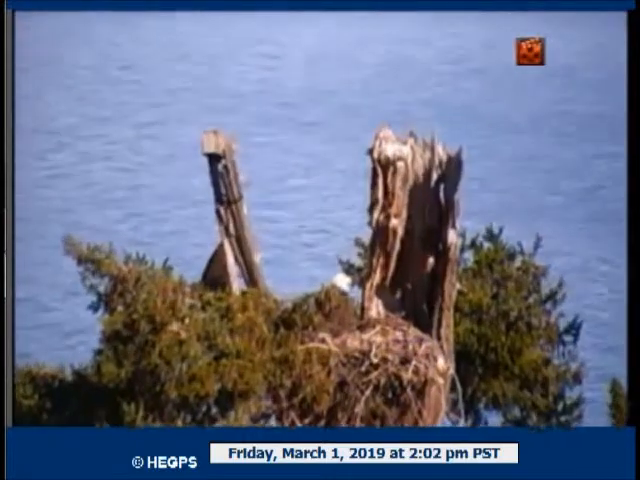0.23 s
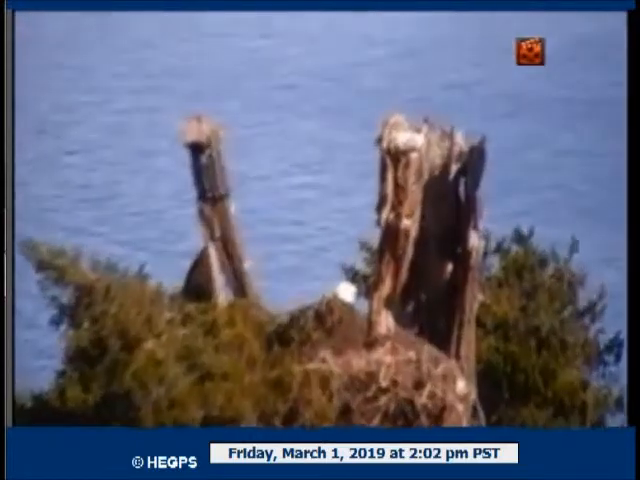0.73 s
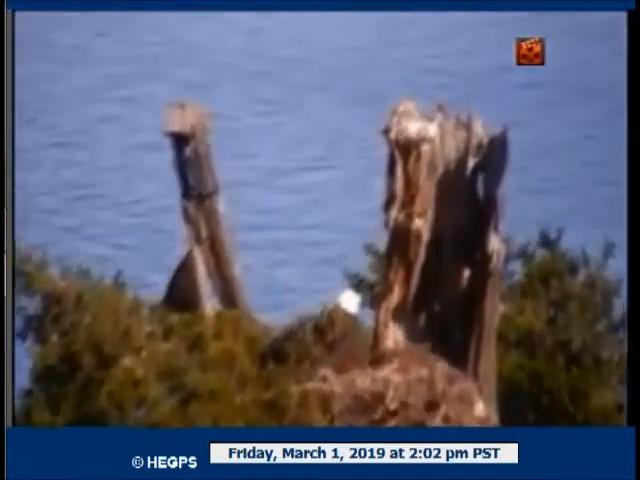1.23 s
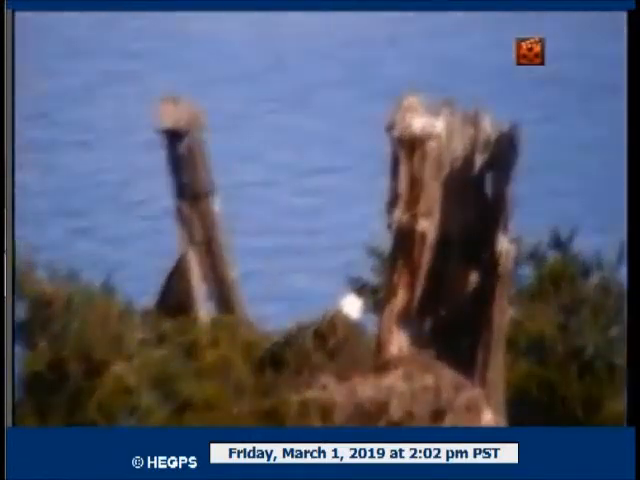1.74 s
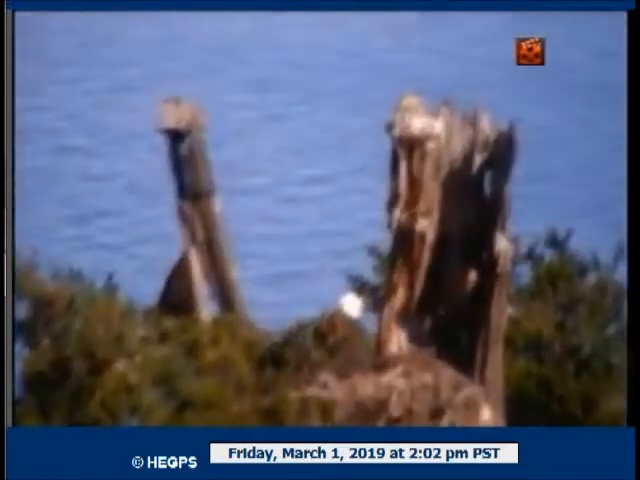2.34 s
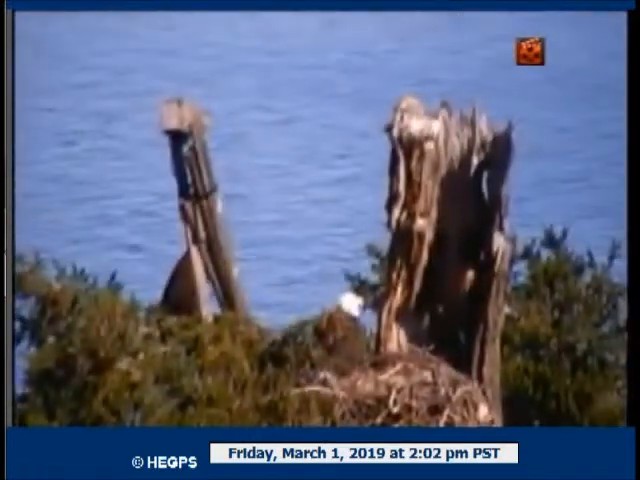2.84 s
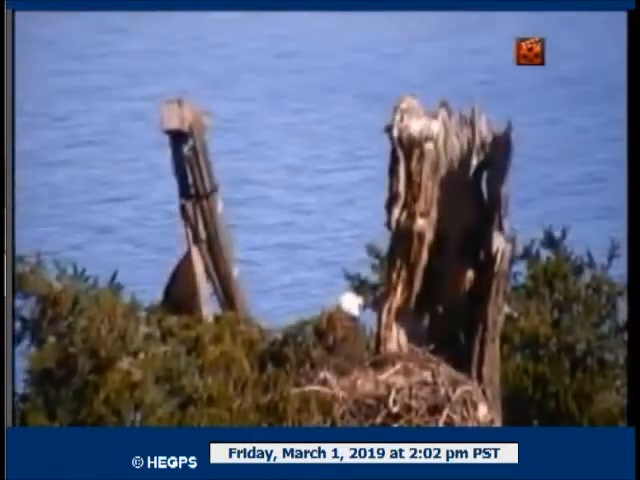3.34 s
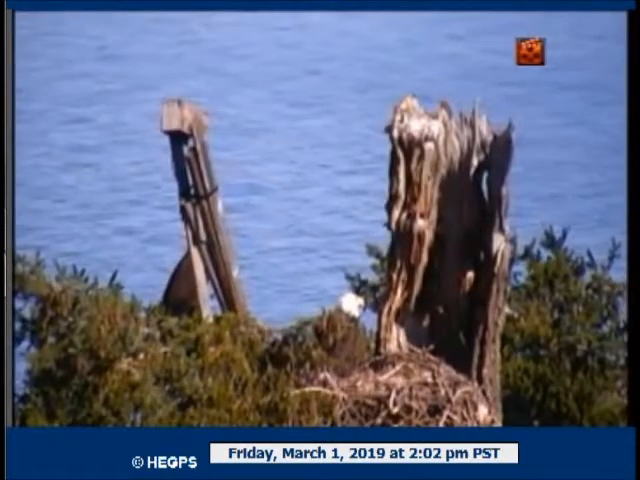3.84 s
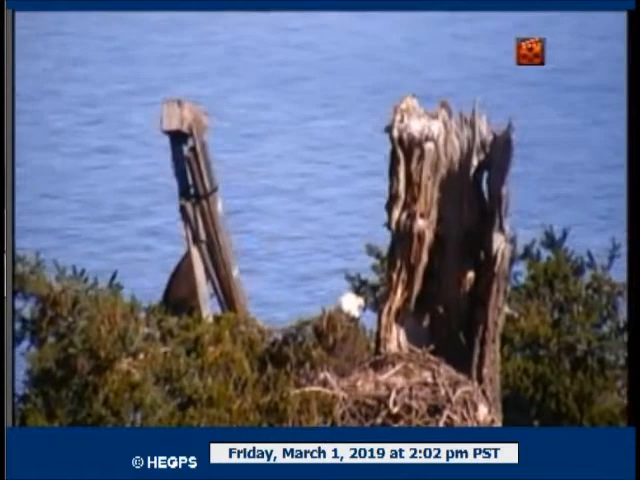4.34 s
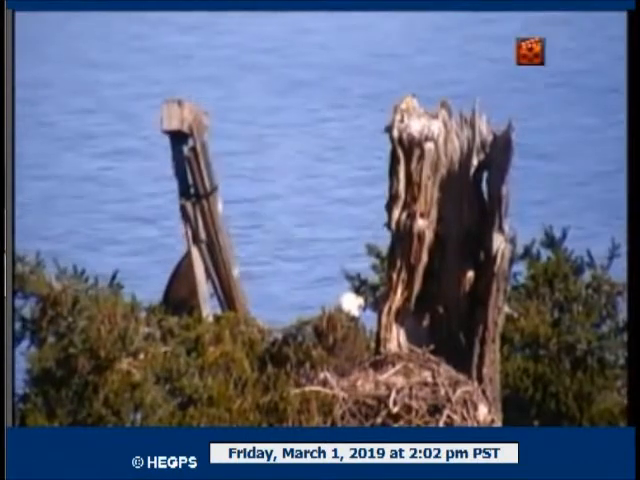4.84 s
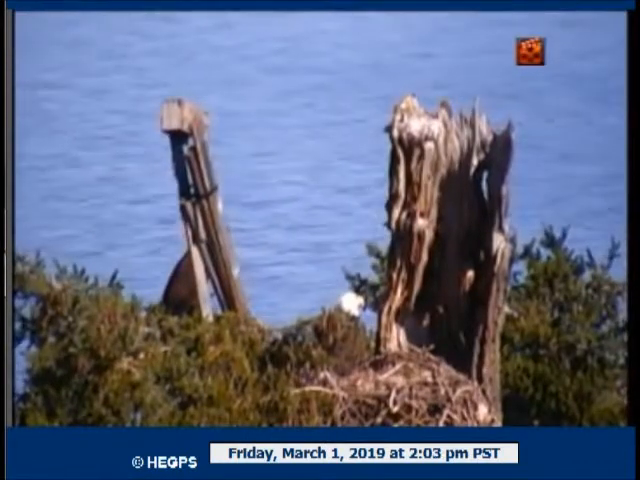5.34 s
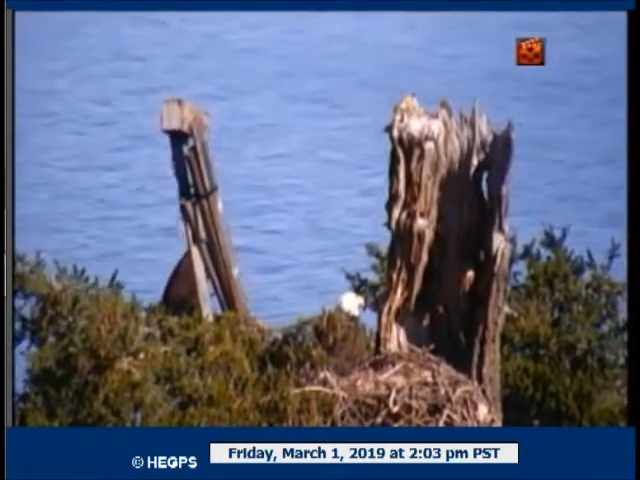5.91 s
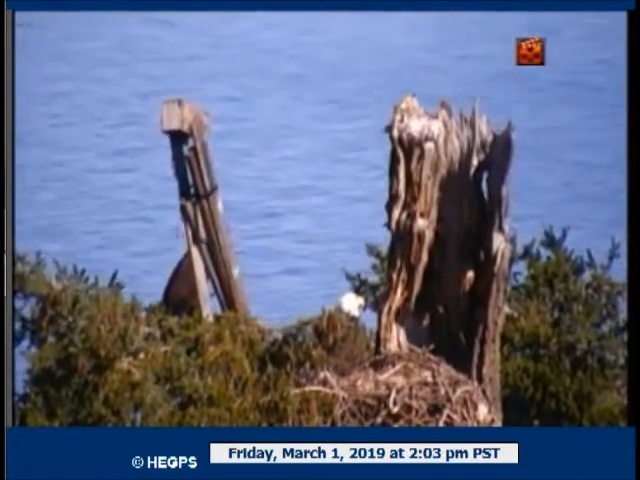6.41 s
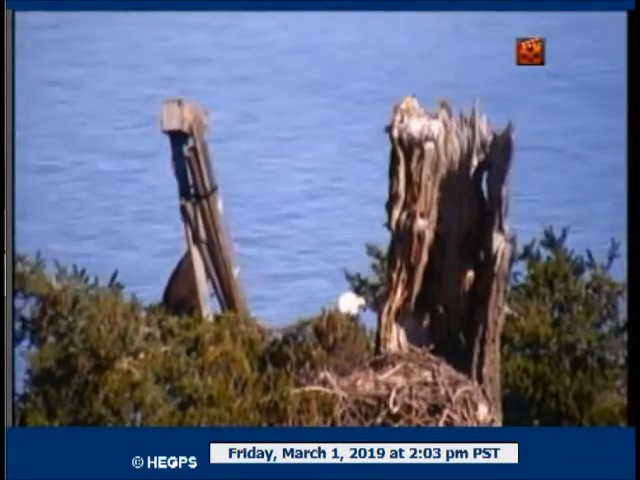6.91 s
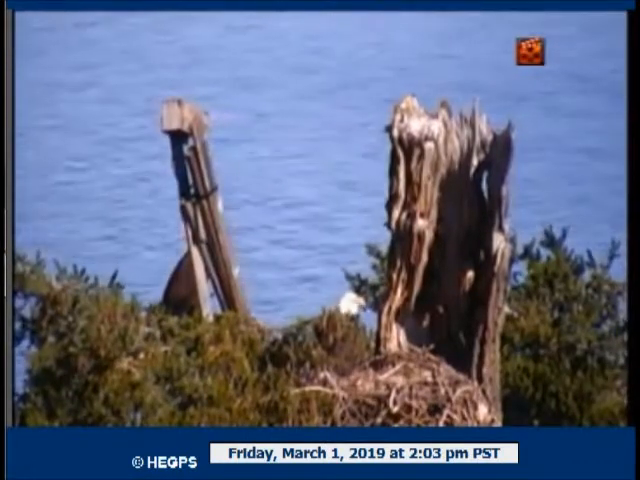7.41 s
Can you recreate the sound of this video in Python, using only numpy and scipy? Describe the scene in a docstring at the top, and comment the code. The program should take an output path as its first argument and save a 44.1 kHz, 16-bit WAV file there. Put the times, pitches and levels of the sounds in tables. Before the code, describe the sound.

Low fans hum and throb over dull air and thin electrical buzz; faint distant bird whistles, then something nearby drags with juddering hollow knocks.

```python
"""Two fans hum against each other over a dull rush of air, with a thin mains buzz and hiss in a quiet room.
The fans are sine tones, the air and hiss are shaped noise, the buzz is a spike each half mains cycle.
A far bird gives very faint gliding sine whistles; small ticks are puffs of noise through resonances.
Near the end something close by is rolled or dragged over a hard surface and judders with uneven hollow
knocks: jolts and tiny contacts ring a bank of modes, one mode squeals, and a gritty scrape flares."""
import sys
import numpy as np
from scipy import signal
from scipy.fft import rfft, irfft
from scipy.io import wavfile
from scipy.ndimage import map_coordinates

SR = 44100
rng = np.random.default_rng(int(sys.argv[2]) if len(sys.argv) > 2 else 0)


def inscribe(sig):
    """Save sig as 16-bit PCM at rate SR to the path in sys.argv[1].

    A 1-D sig is mono; a 2-D sig holds one channel per row.
    Samples are clipped to [-1, 1] before scaling.
    """
    pcm = np.round(np.clip(np.atleast_2d(sig).T, -1, 1) * 32767)
    wavfile.write(sys.argv[1], SR, pcm.astype(np.int16))


N = 337806
TIME = np.arange(N) / SR
FREQS = np.maximum(np.arange(N // 2 + 1) * SR / N, 1)
CUTOFF_HZ = 11650


def from_db(db):
    """Decibels to amplitude gain."""
    return 10 ** (np.asarray(db) / 20)


def in_time(rows):
    """Draw each column of a breakpoint table as a straight-line curve over every sample."""
    t, *columns = np.transpose(rows)
    return [np.interp(TIME, t, column) for column in columns]


def gain_at(spectrum, hz):
    """Read a spectrum's gain, joining its points on a log-frequency axis."""
    points, db = np.transpose(spectrum)
    return from_db(np.interp(np.log(hz), np.log(points), db))


def noise(spectrum):
    """White noise filtered to the given power per Hz."""
    shaped = rfft(rng.standard_normal(N)) * gain_at(spectrum, FREQS)
    return irfft(shaped, N) * np.sqrt(SR / 2)


def drift(rate_hz):
    """Smooth random wander with spread 1: noise low-passed around the rate."""
    smooth = irfft(rfft(rng.standard_normal(N)) / (1 + (FREQS / rate_hz) ** 4), N)
    return smooth / smooth.std()


def tone(hz, db):
    """A sine from a random phase that follows a pitch curve, at an rms level."""
    turns = np.cumsum(hz * np.ones(N)) / SR + rng.random()
    return np.sqrt(2) * from_db(db) * np.sin(2 * np.pi * turns)


def resonate(x, hz, width_hz):
    """A two-pole resonance with gain 1 on top."""
    r = np.exp(-np.pi * width_hz / SR)
    top = np.array([1, 0, -1]) * (1 - r * r) / 2
    return signal.lfilter(top, [1, -2 * r * np.cos(2 * np.pi * hz / SR), r * r], x + 1e-18)


def resonate_moving(x, hz, width_hz):
    """A gliding resonance with gain 1 on top: shift its centre to zero, smooth, shift back."""
    r = np.exp(-np.pi * width_hz / SR)
    turn = np.exp(2j * np.pi * np.cumsum(hz) / SR)
    return 2 * np.real(turn * signal.lfilter([1 - r], [1, -r], x / turn + 1e-18))


# electrical hiss common to both channels: (f/Hz, level/dB per Hz)
SHARED_HISS = [(300, -100), (2000, -99), (4300, -99.3), (8000, -101.5), (10500, -103), (11600, -110)]


def shared_hiss():
    """Steady electrical noise, the same on both sides."""
    return noise(SHARED_HISS)


# hiss of each channel alone: (f/Hz, level/dB per Hz)
OWN_HISS = [(100, -99.5), (1000, -93), (2000, -100), (4500, -102), (6500, -106), (7900, -120), (9300, -109),
            (10700, -105), (11800, -110)]


def own_hiss():
    """Steady noise drawn afresh for each channel, so the two sides are unrelated."""
    return noise(OWN_HISS)


MAINS_HZ = 59.987
# mains buzz, envelope of its harmonics: (f/Hz, level/dB rms of a harmonic)
BUZZ = [(400, -71.5), (1100, -69), (1400, -73), (2000, -76), (3700, -82), (6000, -84), (10300, -98.5),
        (11800, -101)]


def buzz(size=4096):
    """A sharp spike each half cycle of the mains, alternating in sign: odd harmonics only."""
    odd = np.arange(1, CUTOFF_HZ // MAINS_HZ, 2).astype(int)
    harmonics = np.zeros(size // 2 + 1)
    harmonics[odd] = gain_at(BUZZ, odd * MAINS_HZ) * size / np.sqrt(2)
    one_cycle = irfft(harmonics)
    return np.interp(TIME * MAINS_HZ % 1, np.arange(size) / size, one_cycle)


# colour of the far rush, before its swell: (f/Hz, level/dB per Hz)
RUSH = [(120, -82), (230, -51), (300, -62), (420, -72), (560, -78), (900, -100)]
# swell of the far rush: (t/s, level/dB relative to its colour)
RUSH_SWELL = [(0, -11.5), (1.8, -17.5), (2.8, -15), (3.7, -7), (4.5, -5.5), (5.1, -27), (7.66, -22)]
SURGE_DB, SURGES_HZ = 2.5, 8.3   # spread and rate of the random surges


def rush():
    """A far, dull rush: low noise that swells along a curve and surges at random."""
    swell_db, = in_time(RUSH_SWELL)
    return noise(RUSH) * from_db(swell_db + SURGE_DB * drift(SURGES_HZ))


# colour of the moving air, before its trim: (f/Hz, level/dB per Hz)
AIR = [(20, -84), (45, -67.5), (65, -62), (115, -61), (160, -56.5), (190, -55.5), (232, -59.5),
       (290, -69.5), (350, -72), (430, -71.5), (540, -78.5), (700, -78), (820, -89), (1000, -84.5),
       (1500, -94), (3000, -108), (8000, -135)]
AIR_TRIM_DB = -.5


def moving_air():
    """The fans push air, heard as a steady dull noise."""
    return noise(AIR) * from_db(AIR_TRIM_DB)


# the slowing fan: (t/s, f/Hz, in turns per second)
FAN_SPEED = [(0, 95.9), (1.1, 95.4), (2.1, 94.7), (3.3, 94.4), (4.7, 93.6), (7.66, 92.8)]
# its tones swell and fade: (t/s, fundamental level/dB rms, octave level/dB rms before wavering)
FAN_TONES = [(0, -29.5, -27.5), (1.1, -30, -24), (1.3, -30.5, -29.5), (1.9, -29.5, -32.5), (2.3, -31, -45),
             (3.1, -41, -43), (3.7, -33.5, -37.5), (3.95, -38.5, -33.5), (4.5, -33.5, -30),
             (4.75, -34, -25), (4.92, -33.5, -29), (5.2, -33, -28.5), (5.35, -32, -31.5),
             (5.85, -32.5, -33), (6.4, -39, -36.5), (6.8, -45, -40.5), (7.0, -48, -30.5), (7.3, -40, -42.5),
             (7.66, -36.5, -49)]
# its third harmonic: (t/s, level/dB rms before wavering)
FAN_THIRD = [(0, -51.5), (.9, -59), (1.45, -42.5), (1.75, -43), (2.1, -75), (7.66, -48.5)]
# how much its overtones break up: (t/s, share 0-1)
HUM_WAVER = [(1.9, 0.05), (2.1, 0.81), (3.7, 1), (4.2, 0.07)]
WAVER_DB, WAVER_SHARE, WAVER_HZ = 2.5, 0.0246, 6.2   # level and pitch spread at full waver; rate
# the steady fan and other motor tones: (f/Hz, level/dB rms)
STEADY_TONES = [(71.3, -34), (299.9, -54), (539.9, -67.5), (659.9, -61), (779.8, -76.5), (926, -62.5),
                (1017, -71)]


def fans():
    """Two close low tones beat together; the slowing fan's overtones waver in level and pitch."""
    speed, = in_time(FAN_SPEED)
    fundamental_db, octave_db = in_time(FAN_TONES)
    third_db, = in_time(FAN_THIRD)
    waver, = in_time(HUM_WAVER)
    waver_db = WAVER_DB * waver * drift(WAVER_HZ)
    unsteady = speed * (1 + WAVER_SHARE * waver * drift(WAVER_HZ))
    slowing = tone(speed, fundamental_db)
    slowing += tone(2 * unsteady, octave_db + waver_db)
    slowing += tone(3 * unsteady, third_db + waver_db)
    return slowing + sum(tone(hz, db) for hz, db in STEADY_TONES)


# small soft ticks and bumps: (t/s, f/Hz, width/Hz, level/dB per Hz at the puff's peak, rise/s)
TICKS = [(4.282, 627, 260, -67.5, 0.0032), (4.32, 610, 100, -72, 0.019), (4.696, 1900, 450, -85, 0.0036),
         (4.872, 2206, 420, -83, 0.004), (5.646, 900, 500, -80, 0.0023), (5.704, 994, 151.2, -76, 0.0097)]


def ticks():
    """Each is a short puff of noise in one resonance, dulled far from its pitch by a broader one."""
    out = np.zeros(N)
    white = rng.standard_normal(N) * np.sqrt(SR / 2)
    for t, hz, width_hz, db, rise_s in TICKS:
        age = np.maximum(TIME - t, 0) / rise_s
        puff = white * age * np.exp(1 - age) * from_db(db)
        out += resonate(resonate(puff, hz, width_hz), hz, hz)
    return out


# bird notes, each one glide before its wobble and flutter:
# (t/s, length/s, first f/Hz, last f/Hz, level/dB rms at mid-note)
WHISTLES = [(2.14, .047, 4720, 5100, -66.5), (2.325, .12, 4340, 4400, -68.5),
            (2.435, .065, 4350, 4620, -66.5), (2.49, .035, 4550, 4420, -68.5),
            (2.493, 0.032, 3950, 3380, -69), (2.525, 0.031, 3550, 4400, -69),
            (2.541, .095, 4360, 4020, -65.5), (2.626, .035, 5700, 5450, -70),
            (2.645, .025, 5500, 4650, -66), (2.921, .045, 4820, 4290, -64),
            (2.955, .035, 4350, 3780, -68.5), (3.008, .028, 5450, 4500, -67.5)]


def bird(waver_share=0.0077, flutter_db=1.5):
    """Thin gliding whistles and short chirps that swell and fade, broken and a little rough with distance."""
    out = np.zeros(N)
    wobble = 1 + waver_share * drift(180)
    flutter = flutter_db * drift(60)
    for t, length_s, first_hz, last_hz, db in WHISTLES:
        note = (TIME > t) & (TIME < t + length_s)
        along = (TIME[note] - t) / length_s
        hz = (first_hz + (last_hz - first_hz) * along) * wobble[note]
        swell = np.sqrt(8 * along * (1 - along))
        out[note] += swell * from_db(db + flutter[note]) * np.sin(2 * np.pi * np.cumsum(hz) / SR)
    return out


# the clearest knocks, before the jolt boosts:
# (t/s, low-mode level/dB, high-mode level/dB)
KNOCKS = [(6.073, -46, -45), (6.099, -31, -36), (6.163, -32.5, -34.5), (6.204, -32, -42),
          (6.212, -44, -30.5), (6.245, -28, -37), (6.290, -28, -46), (6.332, -30.5, -39),
          (6.370, -30.5, -40), (6.404, -27, -36), (6.428, -36, -31.5), (6.458, -34, -36), (6.486, -37, -32),
          (6.511, -34, -32), (6.538, -40, -32), (6.591, -30.5, -38), (6.812, -30, -36), (6.89, -34, -36),
          (6.946, -38, -34.5), (6.997, -33, -35), (7.052, -31.5, -34), (7.136, -36, -36), (7.216, -36, -35),
          (7.242, -40, -40), (7.297, -32, -40), (7.351, -31, -32), (7.402, -34, -30.5), (7.457, -36, -38),
          (7.486, -34, -35), (7.511, -34, -49), (7.566, -35.5, -35), (7.618, -39, -33)]
FIRST_JOLT_S, JOLTS_PER_S = 6.101, 36.95
JUDDER_DB, REBOUND_DB = -4, -3   # judder against the force curve; rebound half a period later
JOLT_SPREAD_DB, JOLT_JITTER_S = 2, 0.001484   # chance differences between jolts


def jolts(force_db):
    """Times and low and high strengths: a weak judder with rebounds that follows the force, and the knocks."""
    t = np.arange(FIRST_JOLT_S, TIME[-1], .5 / JOLTS_PER_S)
    late, size = rng.standard_normal((len(t), 2)).T
    rebound_db = REBOUND_DB * (np.arange(len(t)) % 2)
    db = np.interp(t, TIME, force_db) + JUDDER_DB + rebound_db + JOLT_SPREAD_DB * size
    t = np.minimum(t + JOLT_JITTER_S * late, TIME[-1])
    return np.vstack([np.column_stack([t, db, db]), KNOCKS]).T


def contacts(per_s):
    """Dense tiny knocks of like size at random moments, with unit power per Hz."""
    return (rng.random(N) < per_s / SR) * SR / np.sqrt(2 * per_s)


# colour of the scrape, before its own level curve and the jolts' flares: (f/Hz, level/dB per Hz)
GRIT = [(200, -93), (600, -78.5), (850, -89), (1000, -78.5), (1400, -89), (1720, -82.5), (1830, -90),
        (1960, -84), (2150, -88.5), (2900, -93.5), (4000, -98.5), (5300, -99.5), (7000, -110),
        (10000, -120)]
GRIT_DB, JOLT_GRIT_DB = 58.5, 34   # boosts on the scrape curve and on each jolt's flare


def scrape(scrape_db, bite, t, high_db, flare_s=0.0022, harsh_db=1.5):
    """Gritty noise of uneven level that flares at each jolt and dies back exponentially."""
    flares = np.zeros(N)
    flares[(t * SR).astype(int)] = from_db(high_db + JOLT_GRIT_DB)
    flares = signal.lfilter([1], [1, -np.exp(-1 / (flare_s * SR))], flares + 1e-18)
    level = from_db(scrape_db + GRIT_DB + harsh_db * drift(110))
    return noise(GRIT) * level * (bite + flares)


SQUEAL_DB, SQUEAL_WAVER, SQUEAL_WAVER_HZ = 11.5, 0.01197, 45   # boost on its curve; pitch share and rate


def squeal(hz, db):
    """Friction keeps the sliding mode singing as a sine of unsteady pitch."""
    return tone(hz * (1 + SQUEAL_WAVER * drift(SQUEAL_WAVER_HZ)), db + SQUEAL_DB)


# the rolling thing, before the boosts: (t/s, rumble level/dB, gritty scrape level/dB)
ROLL = [(6.2, -35.5, -57.5), (6.38, -33.5, -55), (6.55, -35, -54.5), (6.68, -36, -51.5), (6.85, -35, -56),
        (7.0, -36.5, -57), (7.3, -36, -58.5), (7.66, -35, -59.5)]
# its modes, driven differently as it moves: (f/Hz, width/Hz, first gain level/dB, last gain level/dB)
BODY = [(227.1, 9.4, -47.5, -45.5), (370, 17, -55, -62), (411, 18, -62, -67), (482.2, 18.7, -47.5, -58.5),
        (551, 29, -60.5, -60), (600, 77, -71, -67.5), (666, 27, -72, -66), (755, 35, -64, -68.5),
        (919.6, 20, -64, -58), (983, 26, -55.5, -67.5), (1052, 46, -61.5, -64.5), (1106, 51, -65, -68.5),
        (1158, 34, -74, -61.5), (1450, 65, -71.5, -68), (1512, 33, -70, -70.5), (1652, 37, -78, -67.5),
        (1703, 35, -71, -73.5), (1950, 85, -75.5, -72), (2254, 64, -76, -80.5)]
# its way from the first place to the last: (t/s, share 0-1)
TRAVEL = [(6.4, 0.24), (6.65, 0.83), (7.15, 0.86), (7.42, 1)]
# one bright resonance slides as it moves: (t/s, f/Hz, gain level/dB)
SLIDING_MODE = [(6.4, 1030, -67), (6.75, 1056, -73), (6.93, 1158, -68), (7.15, 1190, -62), (7.3, 1195, -63),
                (7.42, 1178, -59), (7.52, 1173, -58.5), (7.63, 1157, -58)]
SLIDING_WIDTH_HZ = 32
ROLL_START_S, RUMBLE_RISE_S, BITE_RISE_S = 6.055, 0.2, 0.18   # bite fades in judder, scrape and squeal
RUMBLE_DB, JOLT_DB = 30, 10   # boosts on the rumble curve and the jolt strengths
LOW_MODES_HZ, HIGH_MODES_HZ = 560, 930   # between these a knock passes from low to high strength


def rolling(scatter_s=0.002464, skirt_hz=480):
    """Jolts strike every mode and flare the scrape; tiny contacts keep the body ringing and one mode squeals."""
    push_db, scrape_db = in_time(ROLL)
    travel, = in_time(TRAVEL)
    slide_hz, slide_db = in_time(SLIDING_MODE)
    attack = np.sqrt(np.clip((TIME - ROLL_START_S) / RUMBLE_RISE_S, 0, 1))
    bite = np.clip((TIME - ROLL_START_S) / BITE_RISE_S, 0, 1)
    t, low_db, high_db = jolts(push_db + 20 * np.log10(bite + 1e-9))
    rumble = attack * from_db(push_db + RUMBLE_DB) * contacts(4000)

    def drive(hz):
        """Force on one mode: scattered jolts and contacts through a wide resonance that darkens the valleys."""
        when, sign, chance = rng.random((len(t), 3)).T
        db = low_db + (high_db - low_db) * np.interp(hz, [LOW_MODES_HZ, HIGH_MODES_HZ], [0, 1])
        uneven_db = 1.25 - chance
        moment = np.minimum((t + scatter_s * when) * SR, N - 1).astype(int)
        kicks = np.zeros(N)
        kicks[moment] = SR * np.sign(sign - .5) * from_db(db + JOLT_DB + uneven_db)
        return resonate(kicks + rumble * rng.standard_normal(N), hz, skirt_hz)

    body = np.zeros(N)
    for hz, width_hz, first_db, last_db in BODY:
        body += resonate(drive(hz), hz, width_hz) * from_db(first_db + travel * (last_db - first_db))
    body += resonate_moving(drive(slide_hz[-1]), slide_hz, SLIDING_WIDTH_HZ) * from_db(slide_db)
    body += bite * squeal(slide_hz, slide_db)
    return body + scrape(scrape_db, bite, t, high_db)


def scene():
    """One signal feeds both channels, the right a little softer and later; each adds its own hiss."""
    mono = shared_hiss() + buzz() + rush() + moving_air() + fans() + ticks() + bird() + rolling()
    lag_s, right_db = 1 / 16000, -.25
    late = map_coordinates(mono, [(TIME - lag_s) * SR], order=3, mode="nearest")
    return np.array([mono + own_hiss(), late * from_db(right_db) + own_hiss()])


def record(dry):
    """A steep elliptic low-pass cuts the top."""
    return signal.sosfilt(signal.ellip(12, .1, 90, CUTOFF_HZ, fs=SR, output="sos"), dry)


dry = scene()
out = record(dry)
inscribe(out)
```